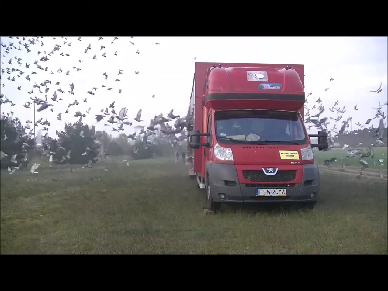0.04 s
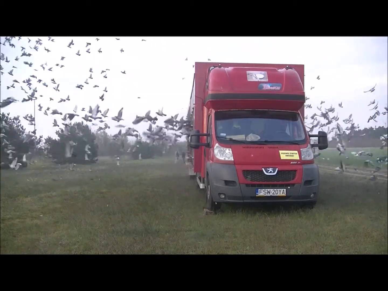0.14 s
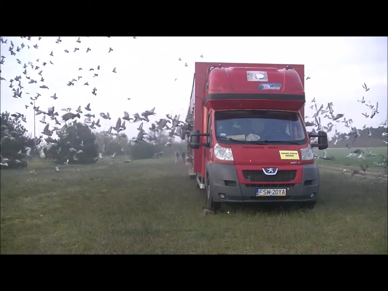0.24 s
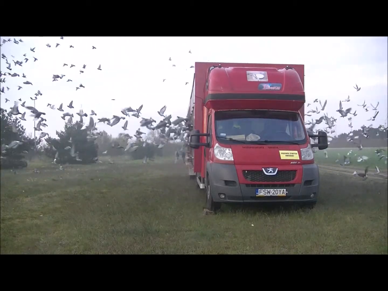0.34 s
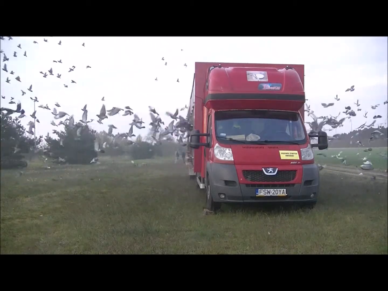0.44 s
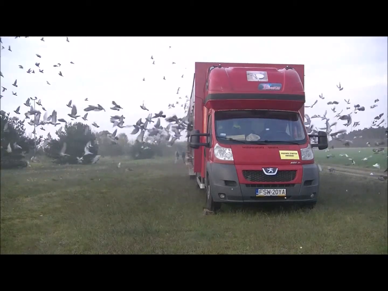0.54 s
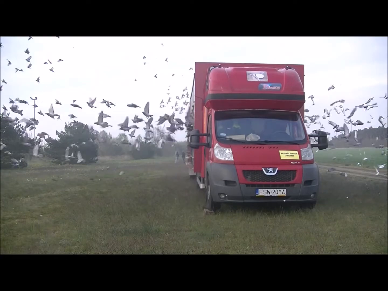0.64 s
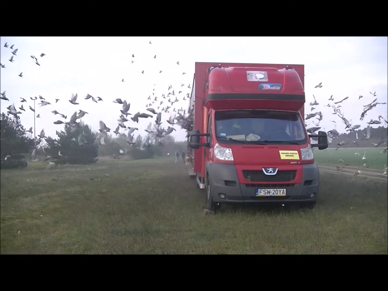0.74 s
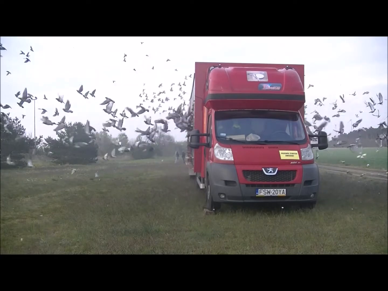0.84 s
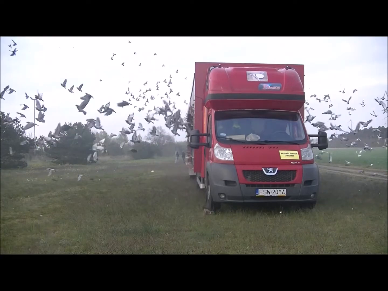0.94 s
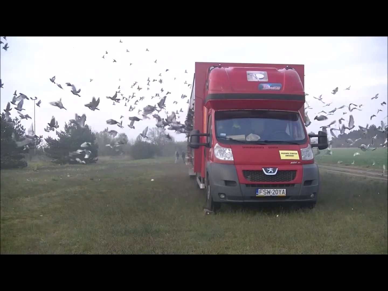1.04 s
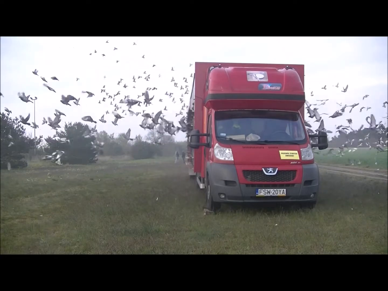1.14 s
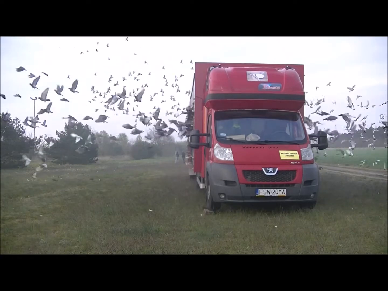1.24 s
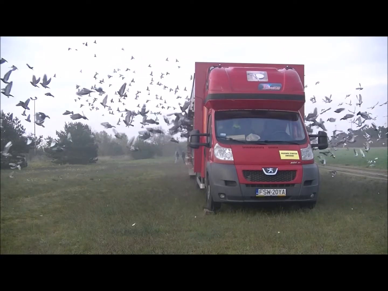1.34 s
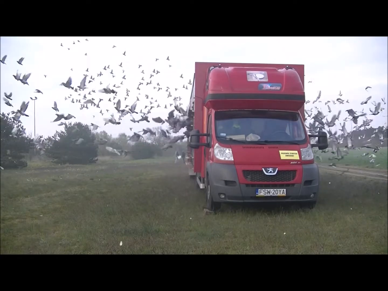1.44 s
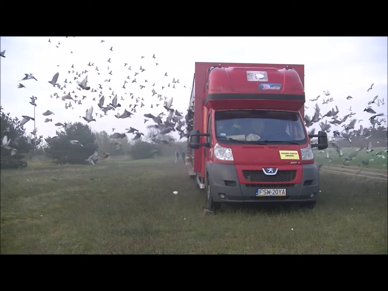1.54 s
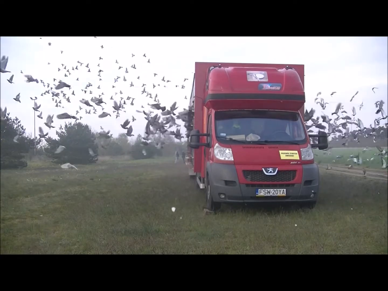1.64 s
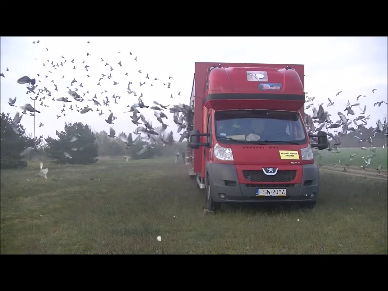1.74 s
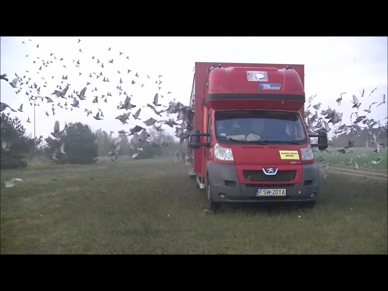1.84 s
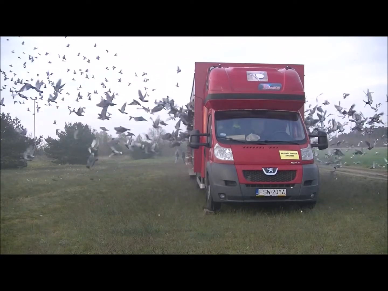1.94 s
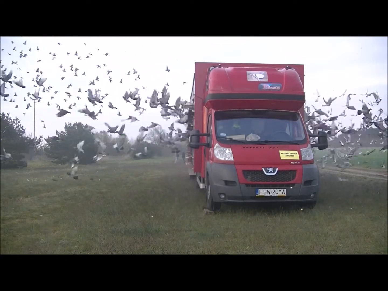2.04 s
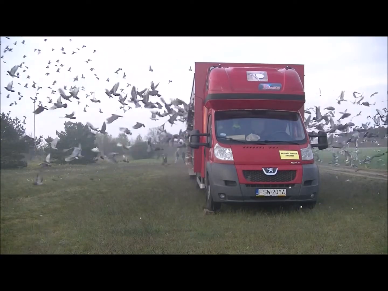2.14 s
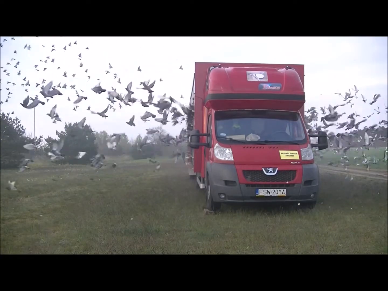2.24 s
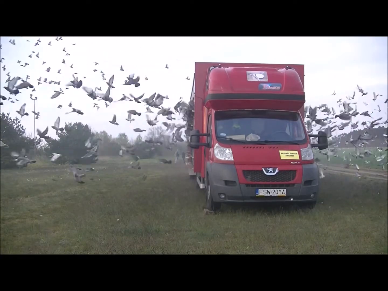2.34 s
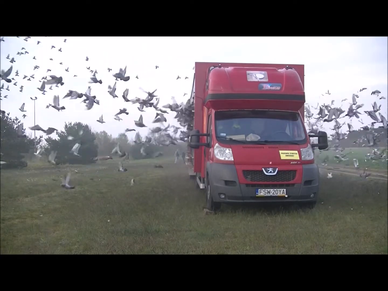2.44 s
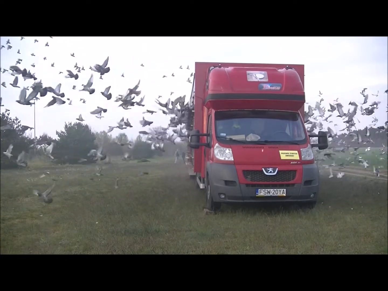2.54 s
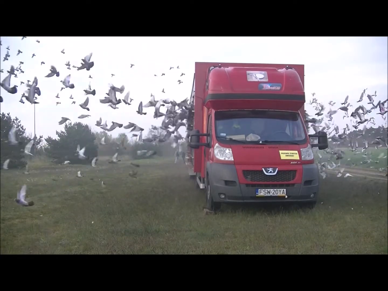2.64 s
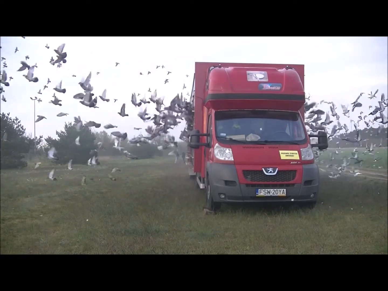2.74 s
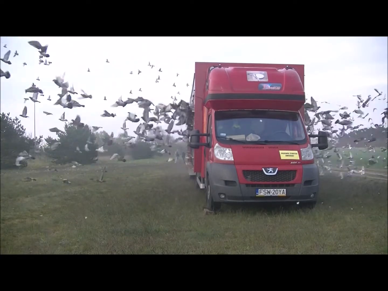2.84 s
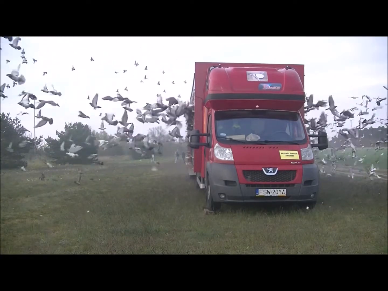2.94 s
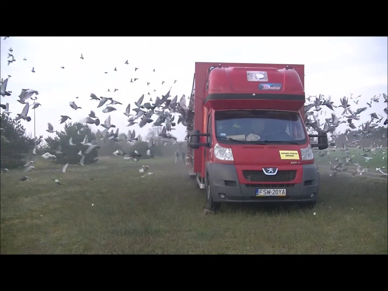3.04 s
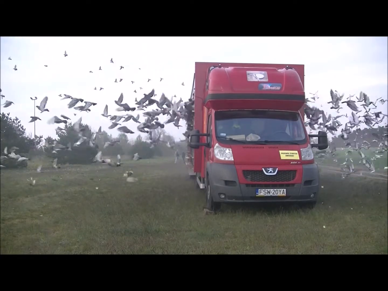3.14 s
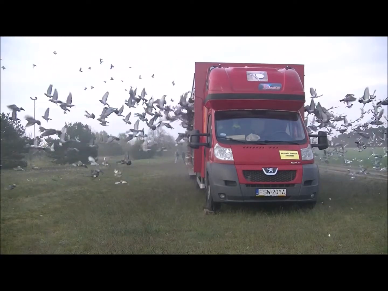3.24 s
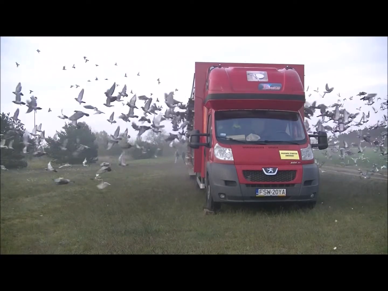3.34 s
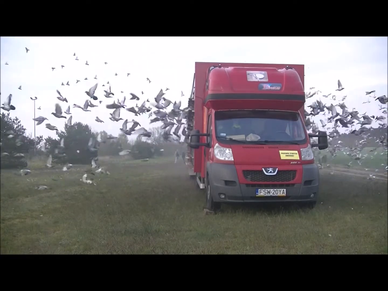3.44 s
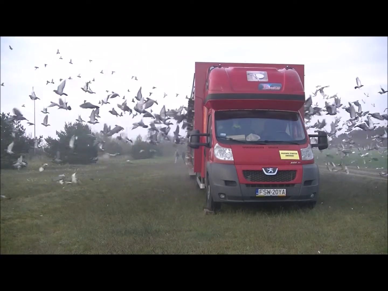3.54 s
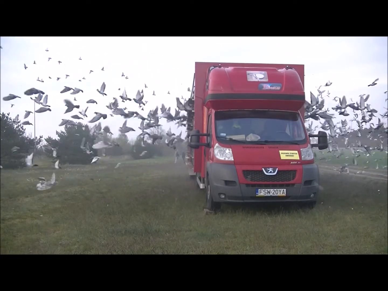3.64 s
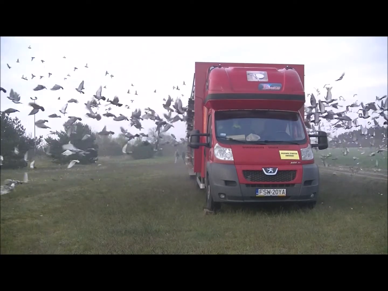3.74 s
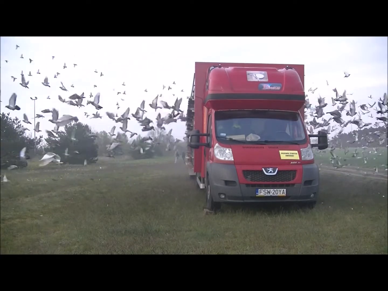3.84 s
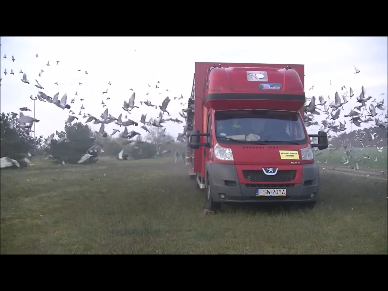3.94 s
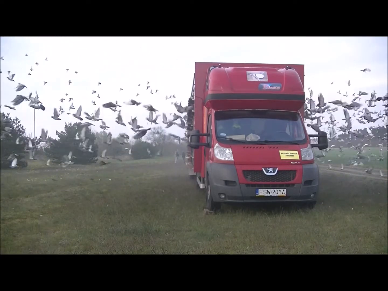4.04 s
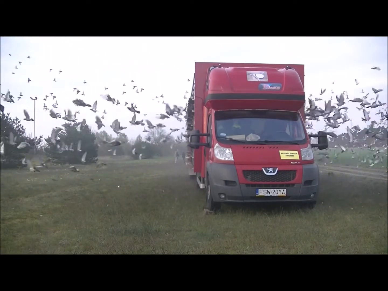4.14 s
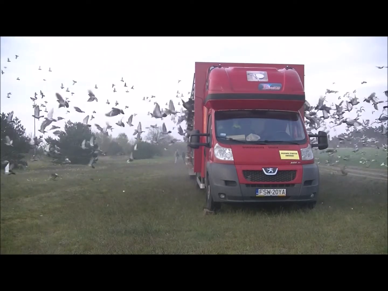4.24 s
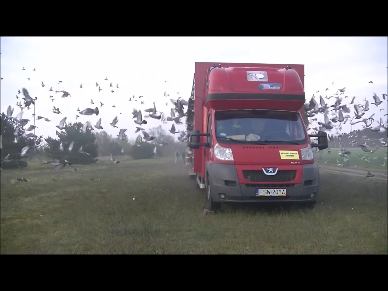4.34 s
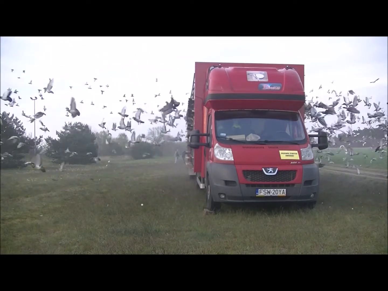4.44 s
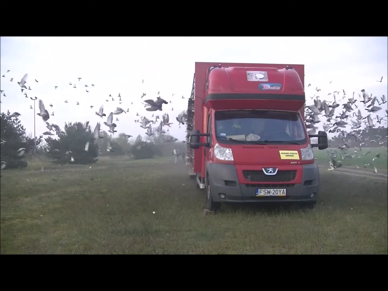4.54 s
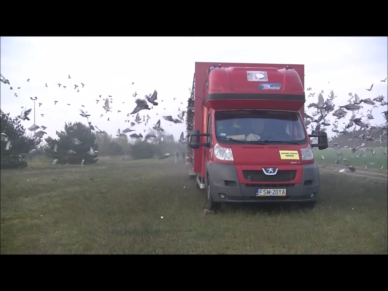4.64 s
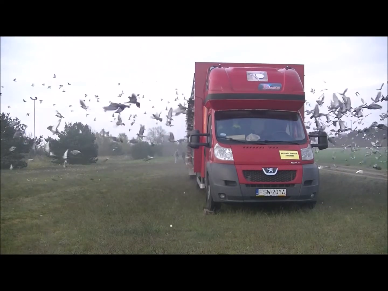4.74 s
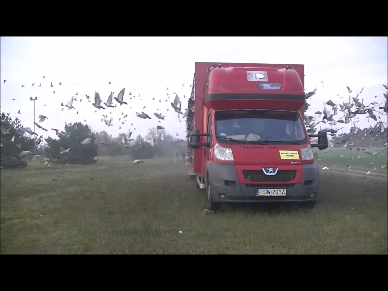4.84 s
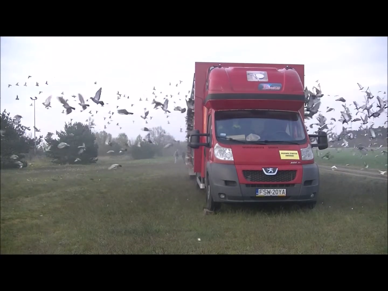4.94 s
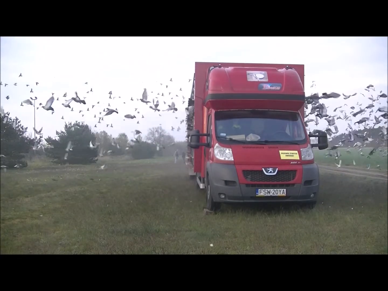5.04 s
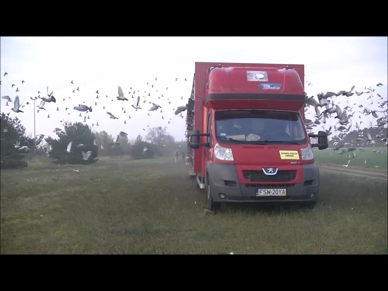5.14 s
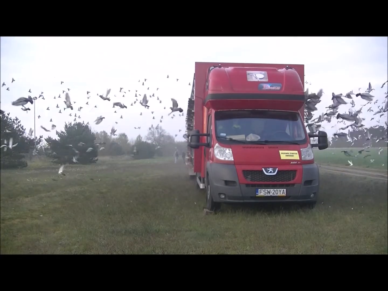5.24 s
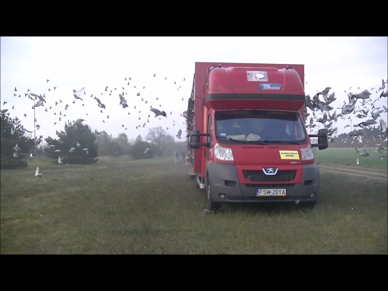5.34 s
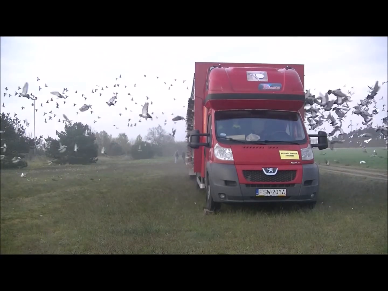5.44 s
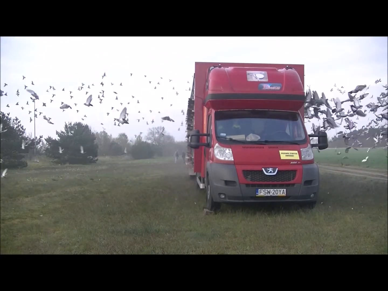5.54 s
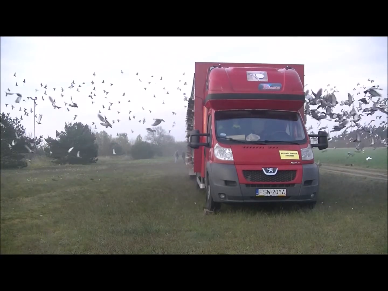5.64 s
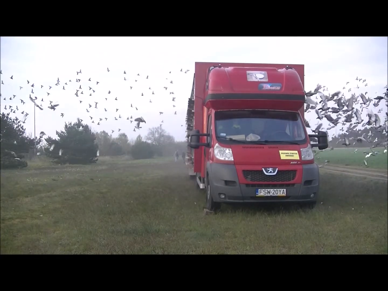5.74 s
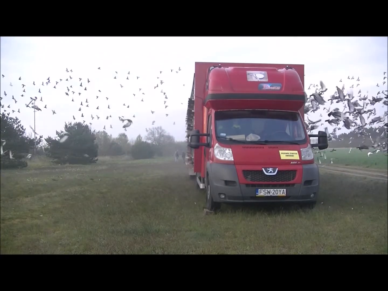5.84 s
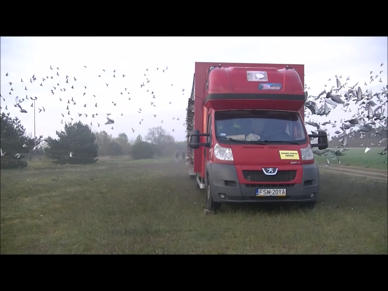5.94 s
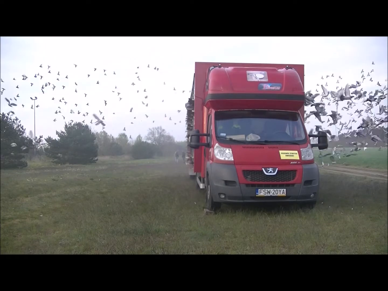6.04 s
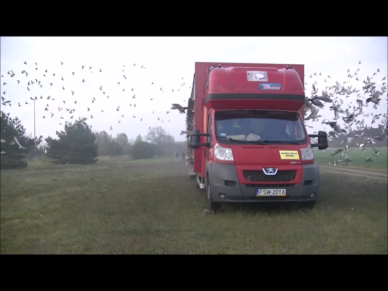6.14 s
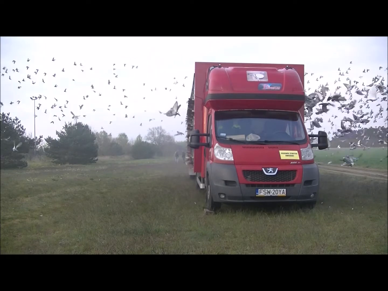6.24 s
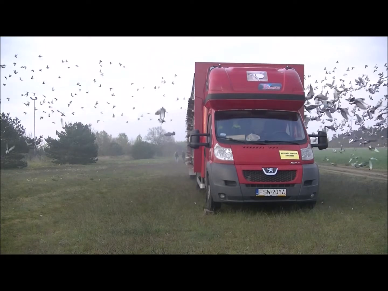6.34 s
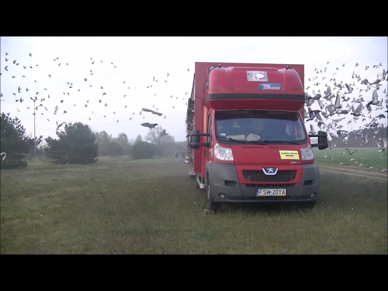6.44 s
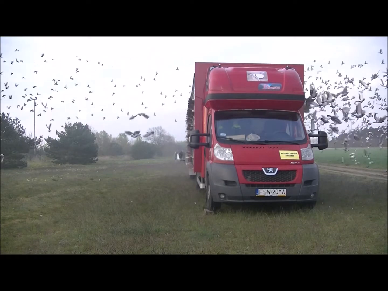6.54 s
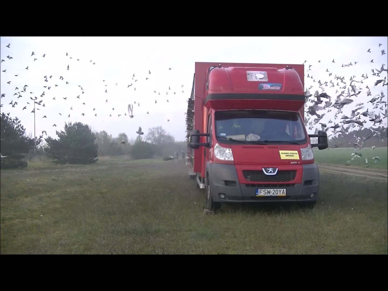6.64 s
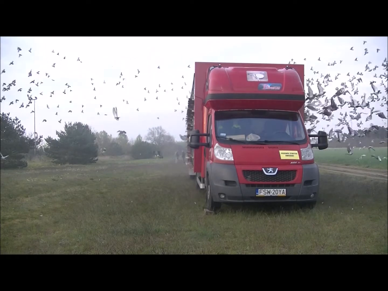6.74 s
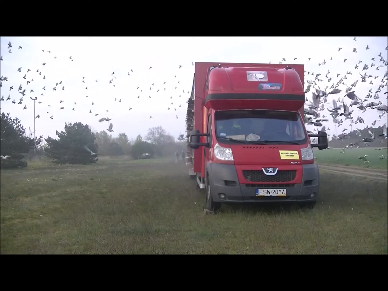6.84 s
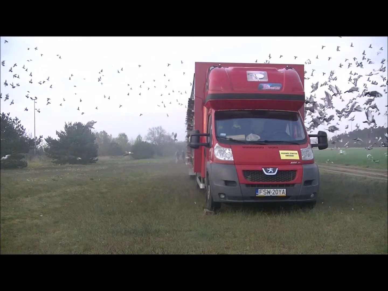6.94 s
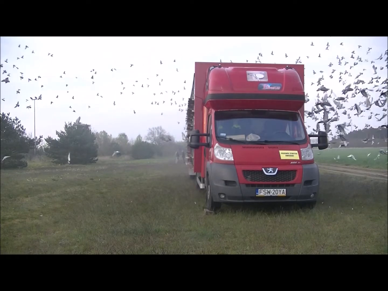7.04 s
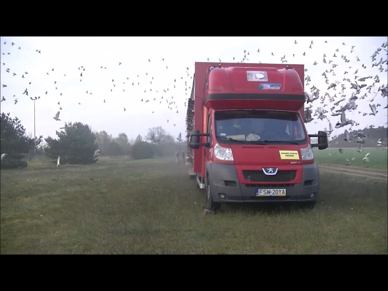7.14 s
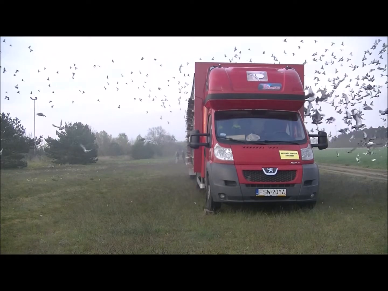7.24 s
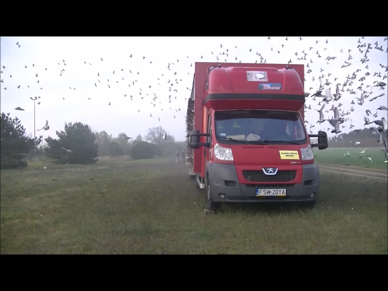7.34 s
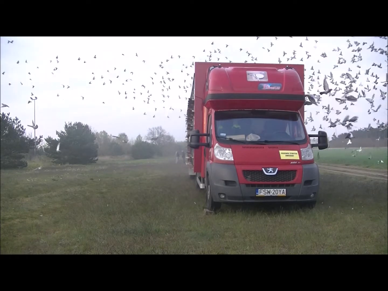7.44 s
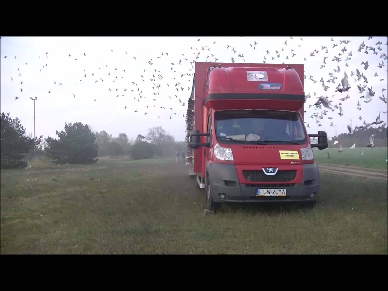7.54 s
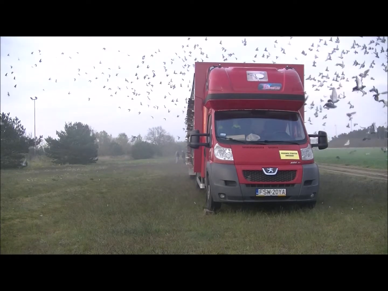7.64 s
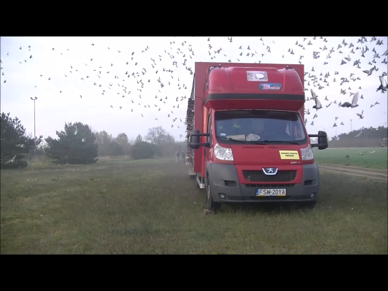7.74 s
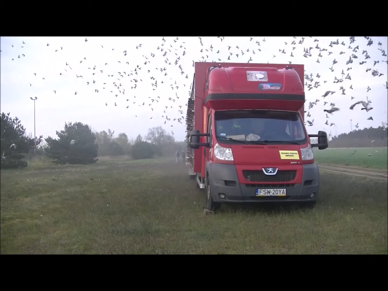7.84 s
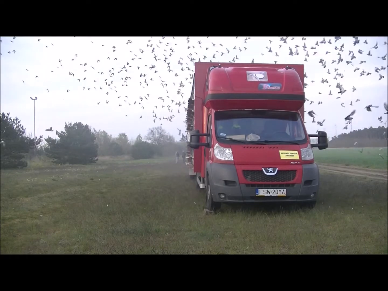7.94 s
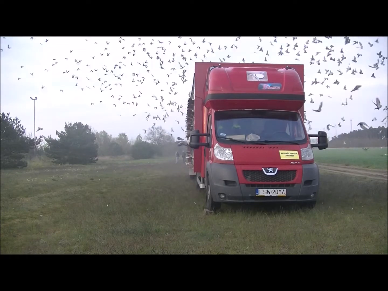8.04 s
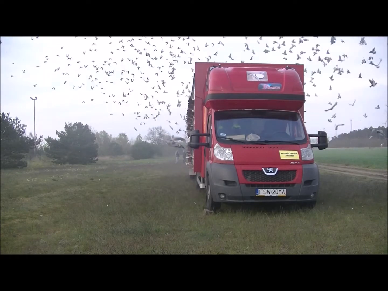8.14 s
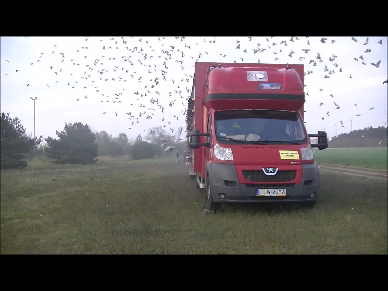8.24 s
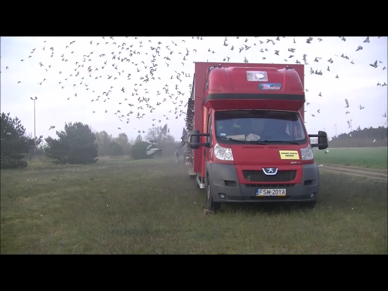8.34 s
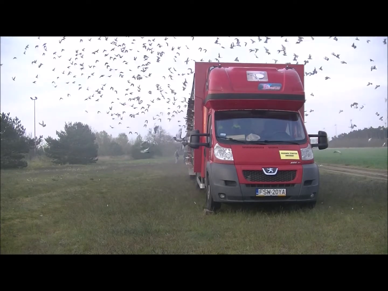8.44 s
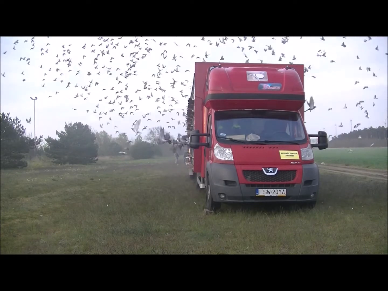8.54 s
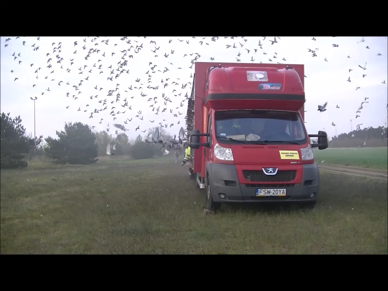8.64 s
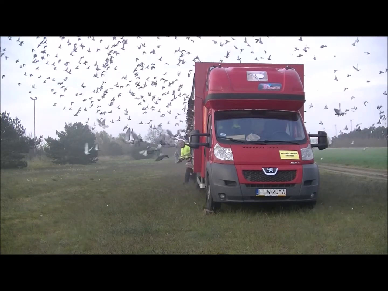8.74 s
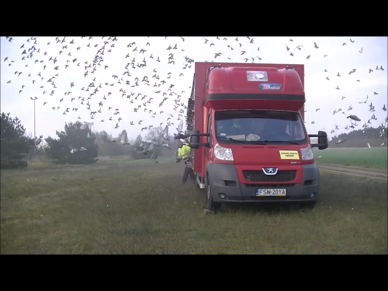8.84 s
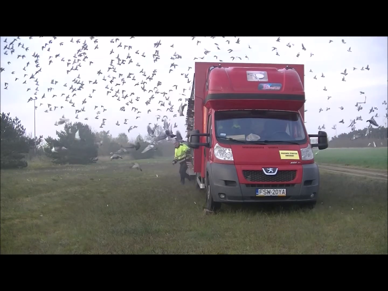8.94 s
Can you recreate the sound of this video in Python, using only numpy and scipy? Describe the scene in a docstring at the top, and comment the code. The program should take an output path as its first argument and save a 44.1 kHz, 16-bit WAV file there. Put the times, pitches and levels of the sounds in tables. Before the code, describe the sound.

Hundreds of pigeon wings flutter and slap loudly outdoors, crackling with bright claps, thinning after several seconds while the camera is occasionally bumped.

```python
"""Pigeon flock taking off

A large flock of pigeons bursts out of crates on a van in an open field, some metres from a camera on a stand.
Wing strokes and slaps are overlapping bursts of noise; near wing claps are short pops with a snap and a flutter.
Now and then something knocks the camera: its stand and shell ring as fading sine waves under a noisy rattle.
Stirred air on its two microphone ports is low noise, with three puffs and one rising whoosh.
"""
import sys
import numpy as np
from scipy import signal
from scipy.fft import rfft, irfft, next_fast_len
from scipy.io import wavfile
from scipy.ndimage import uniform_filter1d

SR = 44100
rng = np.random.default_rng(int(sys.argv[2]) if len(sys.argv) > 2 else 0)


def persist_wave(psi):
    """Save psi, clipped to +-1, as 16-bit WAV."""
    counts = np.round(np.clip(psi, -1, 1) * 32767).astype(np.int16)
    wavfile.write(sys.argv[1], SR, np.atleast_2d(counts).T)


N = 396018  # samples, about 9 s


def undb(db):
    """Turn decibels into a plain gain."""
    return 10 ** (np.asarray(db) / 20)


def unit(x):
    """Scale a signal to an average (RMS) level of 1."""
    return x / np.sqrt(np.mean(x ** 2))


def curve(table):
    """Draw straight lines between the rows of a time table: each column at every sample."""
    s, *columns = np.transpose(table)
    return [np.interp(np.arange(N) / SR, s, column) for column in columns]


def along(table, hz):
    """Read a frequency table at any pitch, with straight lines on a logarithmic pitch scale."""
    table_hz, value = np.transpose(table)
    return np.interp(np.log(hz + 1), np.log(table_hz + 1), value)


def colour(table, size=2048):
    """Make a filter of energy 1 with the table's tone colour and no sound before its cause."""
    log_gain = np.log(undb(along(table, np.arange(size // 2 + 1) * SR / size)))
    # folding the cepstrum moves all of the response after time zero
    cepstrum = irfft(log_gain)
    cepstrum[1:size // 2] *= 2
    cepstrum[size // 2 + 1:] = 0
    response = irfft(np.exp(rfft(cepstrum)))
    return response / np.sqrt(np.sum(response ** 2))


def band(x, lo_hz, hi_hz):
    """Keep only the pitches between two limits."""
    return signal.sosfilt(signal.butter(2, [lo_hz, hi_hz], "bandpass", fs=SR, output="sos"), x)


def bands(low, middle, high, body_hz=2400, snap_hz=6800):
    """Join body, middle and snap of a wing sound, crossfaded so that equal parts add up flat."""
    hz = np.arange(N // 2 + 1) * SR / N
    body = 1 / (1 + (hz / body_hz) ** 3)
    snap = 1 - 1 / (1 + (hz / snap_hz) ** 8)
    return irfft(body * rfft(low) + (1 - body - snap) * rfft(middle) + snap * rfft(high), N)


def scatter(rate, spread_db, colour_db):
    """Random onsets, a few loud among many weak; each has its own body, middle and snap."""
    chance = rng.random((int(rate * N / SR), 2))
    loudness_db = -spread_db * np.log(1 - .98 * chance[:, 1])
    size = undb(loudness_db + colour_db * rng.standard_normal((len(chance), 3)).T)
    place = (chance[:, 0] * N).astype(int)
    return np.array([np.bincount(place, part, N) for part in size])


def puff(onsets, rise_s, fall_s):
    """A burst of air from each onset: its loudness rises, then dies away."""
    t = np.arange(int(8 * fall_s * SR) + 8) / SR
    shape = (1 - np.exp(-t / rise_s)) * np.exp(-t / fall_s)
    return np.abs(signal.oaconvolve(onsets, shape[None])[:, :N])


def smooth(x, length_s):
    """Average twice over a short window, so that noise becomes a slow wander."""
    length = int(length_s * SR)
    return uniform_filter1d(uniform_filter1d(x, length), length)


SURGE_DB, SURGE_S = 0.62, 0.023  # groups of birds leave together: depth and length of the surges

# The crowd of wings over time:
# (time [s], rush level [dB], deep part against the rush [dB], snap against the rush [dB],
#  how far single wing tips stand out [dB])
FLOCK_OVER_TIME = [(0.0, -26.5, 0, -1.5, 2.5), (0.92, -28, 2, 0.5, 0.5), (2.4, -26, 1, 0.5, -1),
                   (3.55, -24.5, 0, 0, 1), (5.1, -30, 1.5, -1, 0.5), (6.65, -30.5, 0, -1.5, 4.5),
                   (7.18, -30.5, -0.5, -2, 2.5), (8.2, -40, 4.5, 0, 3.5), (8.5, -36.5, 4.5, -1, 1),
                   (8.98, -32.5, -0.5, 1, 4)]


def flock():
    """Far wing tips clap in thin cracks; strokes, slaps and a distant blur shape the rush of air."""
    rush_db, deep_db, snap_db, tips_db = curve(FLOCK_OVER_TIME)
    strokes = unit(puff(scatter(110, 0.96, 3.0), 0.0029, 0.0033))
    tip_onsets = scatter(170, 2.73, 4.45) * undb([[-6], [0], [0]])  # wing tips clap thin
    slaps = unit(puff(tip_onsets, 0.00019, 0.0013))
    # distance dulls the blur, so single wings stand out more in the treble
    blur_db = np.array([[-1.5], [-5.5], [-5.5]])
    stroke_power = undb(-7.5) ** 2 * strokes ** 2
    slap_power = undb(tips_db - 9.5) ** 2 * slaps ** 2
    power = stroke_power + slap_power + undb(blur_db) ** 2
    surge = unit(smooth(rng.standard_normal(N), SURGE_S))
    gain = undb(rush_db + SURGE_DB * surge + np.array([deep_db, 0 * deep_db, snap_db]))
    far_crack = gain * undb(tips_db - 8.5) * unit(tip_onsets)
    rush = gain * np.sqrt(power / power.mean(axis=1, keepdims=True))
    return far_crack, rush


# other near claps fall by chance: level over the rush and its range; snap; pitch and its spread
STRAY_CLAPS, STRAY_OVER_DB, STRAY_RANGE_DB = 200, 14, 2.5
STRAY_SNAP_DB, STRAY_HZ, STRAY_OCT = -27.5, 4240, 0.41
CLAP_CYCLES, CLAP_LATE_S = 1.13, 0.001205  # basic width of a pop; from the listed time to its middle
SNAP_DB, FLUTTER_DB = 23, -7  # added to every snap; added to every flutter

# The loudest near wing claps:
# (time [s], level [dB], pitch [Hz], snap against the level, before the common boost [dB])
NEAR_CLAPS = [(0.1685, -9, 4870, -30), (0.2897, -9, 5120, -21), (0.431, -8, 5270, -20),
              (0.5026, -9.5, 1490, -14), (0.8345, -7.5, 4470, -25), (1.161, -4, 5020, -22),
              (1.281, -9.5, 4240, -17), (1.3274, -8, 4440, -26), (1.484, -4, 4970, -26),
              (1.882, -3.5, 4860, -22), (2.2003, -3, 4140, -29), (2.3303, -7.5, 5030, -28),
              (2.4039, -16.5, 1040, -24), (2.6549, -7.5, 5300, -32), (2.8125, -2, 4820, -28),
              (3.037, -11, 4560, -27), (3.2515, -7, 4540, -23), (3.2715, -10, 5100, -21),
              (3.3833, -8, 4410, -27), (3.7758, -4.5, 4340, -26), (4.0028, -15, 4970, -22),
              (4.4218, -9.5, 4690, -18), (5.0554, -13.5, 4800, -27), (5.0789, -14, 5220, -26),
              (5.0965, -8, 4830, -28), (5.2225, -8, 4740, -28), (5.3423, -5, 5370, -24),
              (5.5894, -11, 4410, -31), (6.5532, -8.5, 3880, -21), (6.694, -8.5, 5060, -31),
              (6.829, -8, 4580, -21), (6.8683, -7.5, 4770, -24), (6.9541, -10, 4700, -24),
              (6.983, -6.5, 4560, -26), (7.3404, -9, 4600, -23), (7.374, -10, 5130, -30),
              (7.452, -9.5, 5050, -21), (7.508, -9.5, 5100, -27), (7.6163, -7.5, 4880, -27),
              (7.8922, -12, 5070, -25), (8.0272, -10.5, 5100, -25), (8.1827, -9.5, 3850, -26),
              (8.3409, -14, 2980, -34), (8.415, -13.5, 4470, -21), (8.4506, -8, 4170, -25),
              (8.6697, -3.5, 4350, -22), (8.7753, -7, 4480, -20), (8.845, -8.5, 4950, -25)]


def claps():
    """Wing tips meet: a pop of a few cycles at its own pitch, a thin snap, then a short flutter."""
    pick = rng.standard_normal((STRAY_CLAPS, 3)).T
    when = rng.random(STRAY_CLAPS) * (N / SR - .01)
    rush_db = curve(FLOCK_OVER_TIME)[0][(when * SR).astype(int)]
    stray_db = rush_db + STRAY_OVER_DB + STRAY_RANGE_DB * pick[0] / 2
    stray = [when, stray_db, STRAY_HZ * 2 ** (STRAY_OCT * pick[1]), STRAY_SNAP_DB + 4 * pick[2]]
    s, level_db, hz, snap_db = np.hstack([np.transpose(NEAR_CLAPS), stray])

    chance = rng.standard_normal((len(s), 2)).T
    centre = ((s + CLAP_LATE_S) * SR).astype(int)
    reach = np.arange(-100, 200)  # samples around the middle of a pop
    turns = reach * hz[:, None] / SR
    # a pop swells faster than it fades
    width = CLAP_CYCLES * undb(2 * chance[:1].T) * np.where(turns < 0, .6, 1.3)
    swell = undb(level_db)[:, None] * np.exp(-(turns / width) ** 2)
    pop = np.zeros(N + 200)
    np.add.at(pop, centre[:, None] + reach, swell * np.cos(2 * np.pi * turns + chance[1:].T))

    onsets = np.zeros((3, N))  # body, middle, snap
    body_db = -8 - 6 * np.log2(hz / 3000)  # higher claps have less body
    onsets[:, centre] = undb(level_db + np.array([body_db, 0 * s, snap_db + SNAP_DB]))
    crack = onsets * [[1.5], [0], [2.2]]
    flutter = undb(FLUTTER_DB) * puff(onsets, 0.0003, 0.0023)
    return pop[:N], crack, flutter


SWAY_HZ, STAND_HZ, THUD_HZ, SHELL_HZ, CRACK_HZ = 78, 180, 310, 1300, 8000
SWAY_DB = -6.5  # the stand sways with the thud
CRACK_DB, CRACK_S = 4.5, 0.0013  # a hard blow cracks: over the shell's ring at CRACK_HZ; fall time
CLACK_OCT, REBOUND_S = 0.23, .0035  # width of the clack about SHELL_HZ; delay of the rebound
RATTLE_TOP_HZ, RATTLE_OCT_PER_DB = 3500, .2  # a softer blow rattles duller
CHATTER_DB, CHATTER_S = 2.5, .003  # loose parts make the shell's rings waver

# Ringing tones of stand and shell: (pitch [Hz], relative level [dB], time to fall by 60 dB [s])
STAND_AND_SHELL = [(43.6, -17, 0.83), (78.2, -8.5, 0.66), (178, 9, 0.38), (200, 5.5, 0.1),
                   (269, 6.5, 0.068), (340, 5, 0.037), (476, 2.5, 0.039), (613, 0, 0.05),
                   (860, -7.5, 0.032), (1200, -12.5, 0.17), (1323, 5.5, 0.078), (2208, 4, 0.052),
                   (2950, 3, 0.03), (4220, 1, 0.051), (6610, 0.5, 0.086), (7350, 11.5, 0.014),
                   (7760, 10, 0.0091)]
# Knocks on the camera, levels relative:
# (time [s], rattle [dB], thud [dB], ring of the stand [dB], ring of the shell [dB],
#  hardness [dB per octave], extra clack [dB], rebound against the blow [dB])
CAMERA_KNOCKS = [(2.378, -22, -34, -55, -29.5, -2.5, 2, -7), (3.005, -12.5, -33, -44.5, -25, 1, 8, -6),
                 (4.87, -19.5, -38, -33, -27, 2, 6.5, 0), (5.176, -31, -42, -43, -32, -4, 3.5, -5),
                 (6.106, -39, -52, -47, -41, -6, 4, -7), (7.671, -22, -49, -38.5, -31.5, -4.5, -1, -4),
                 (7.763, -20, -42, -38.5, -29.5, 3.5, 4.5, -7), (8.498, -15, -37, -41, -24, 1, -6, -10.5)]


def knocks():
    """Each blow, with a rebound, rings the same tones; a harder blow rings the shell brighter and cracks."""
    out, t = np.zeros((2, N + SR)), np.arange(SR) / SR
    hz, tone_db, t60 = (column[:, None] for column in np.transpose(STAND_AND_SHELL))
    # the shell shakes the ports further out of step in the treble
    lag = np.minimum(0.39 + hz / 6000, 1.6)  # radians
    for s, rattle_db, thud_db, stand_db, shell_db, hard_db, clack_db, rebound_db in CAMERA_KNOCKS:
        chance = rng.standard_normal((len(STAND_AND_SHELL), 2))

        def bright_db(f):
            """Shell level at a pitch: hardness tilts it about SHELL_HZ."""
            return shell_db + hard_db * np.log2(f / SHELL_HZ)

        low_db = np.interp(np.log(hz), np.log([SWAY_HZ, STAND_HZ, THUD_HZ]),
                           [SWAY_DB + thud_db, stand_db, thud_db])
        clack = clack_db * np.exp(-(np.log2(hz / SHELL_HZ) / CLACK_OCT) ** 2)
        blow_db = np.where(hz < 1.3 * THUD_HZ, low_db, bright_db(hz) + clack)
        gain = undb(tone_db + blow_db + 1.1 * chance[:, :1])
        # each tone takes a cycle or two to get going
        envelope = gain * np.exp(-np.log(1000) * t / t60) * (1 - np.exp(-t * hz / 1.12))
        steps = rng.standard_normal((len(STAND_AND_SHELL), int(1 / CHATTER_S) + 2))
        waver = np.array([np.interp(t / CHATTER_S, np.arange(len(row)), row) for row in steps])
        envelope *= undb(CHATTER_DB * (hz > THUD_HZ) * waver)
        phase = 2 * np.pi * hz * (1 + .0005 * chance[:, 1:]) * t

        rattle_top_hz = RATTLE_TOP_HZ * 2 ** (RATTLE_OCT_PER_DB * hard_db)
        rattle_noise = band(rng.standard_normal(SR), 150, rattle_top_hz)
        rattle = undb(rattle_db) * np.exp(-t / 0.0078) * rattle_noise
        crack_noise = band(rng.standard_normal(SR), 5200, 14000)
        rattle += undb(bright_db(CRACK_HZ) + CRACK_DB) * np.exp(-t / CRACK_S) * crack_noise

        left = (envelope * np.sin(phase)).sum(0) + rattle
        right = undb(-1.0) * ((envelope * np.sin(phase - lag)).sum(0) + rattle)
        blow = undb(3.5) * np.array([left, right])
        rebound = np.pad(blow, ((0, 0), (int(REBOUND_S * SR), 0)))[:, :SR]
        start = int((s + 0.001106) * SR)
        out[:, start:start + SR] += blow + undb(rebound_db) * rebound
    return out[:, :N]


# one whoosh: start, level, pitch at the start, climb; length, fade at both ends
WHOOSH_S, WHOOSH_DB, WHOOSH_HZ, WHOOSH_OCT_PER_S = 8.075, -40.5, 177, 13
WHOOSH_HOLD_S, WHOOSH_EDGE_DB_PER_S = .1, 613
PUFF_RISE_S, PUFF_FALL_S = 0.0035, 0.0065

# Air on the ports: (time [s], buffeting level [dB], deepest rumble level [dB])
AIR_OVER_TIME = [(0, -76, -80), (2.5, -65, -76), (4.5, -64, -72), (6.3, -66, -73), (6.95, -56, -70),
                 (7.5, -63, -65), (8.1, -49.5, -56), (8.35, -56, -53), (8.6, -63, -64), (8.98, -63, -70)]
# Single puffs of air on the ports: (time [s], relative level [dB])
AIR_PUFFS = [(6.908, -28), (6.937, -35), (7.16, -31)]


def air():
    """Low noise buffets the ports unequally over a common rumble, with a few puffs and one rising whoosh."""
    mid, side = (unit(band(rng.standard_normal(N), 65, 176)) for _ in range(2))
    deep = unit(band(rng.standard_normal(N), 35, 63))
    buffet_db, deep_db = curve(AIR_OVER_TIME)
    buffeting = undb(buffet_db) * (mid + 0.85 * side * np.array([[1], [-1]]))
    rumble = undb(deep_db) * deep

    # the whoosh is a narrow band of noise: a climbing tone that wanders in strength and phase
    t = np.arange(N) / SR - WHOOSH_S
    hz = WHOOSH_HZ * 2 ** (WHOOSH_OCT_PER_S * np.clip(t, -WHOOSH_HOLD_S, WHOOSH_HOLD_S))
    outside_s = np.maximum(0, np.maximum(-t, t - WHOOSH_HOLD_S))
    whoosh_db = WHOOSH_DB - WHOOSH_EDGE_DB_PER_S * outside_s
    slow = unit(smooth(rng.standard_normal((2, N)), 0.0032))
    phase = 2 * np.pi * np.cumsum(hz) / SR
    whoosh = undb(whoosh_db) * (slow[0] * np.cos(phase) + slow[1] * np.sin(phase))

    onsets = np.zeros((1, N))
    onsets[0, [int(s * SR) for s, _ in AIR_PUFFS]] = undb([db for _, db in AIR_PUFFS])
    puffs = unit(band(rng.standard_normal(N), 80, 290)) * puff(onsets, PUFF_RISE_S, PUFF_FALL_S)
    return puffs + buffeting + rumble + whoosh


# Colour of the wings as the camera hears them: (pitch [Hz], relative level [dB])
WING_COLOUR = [(40, -32), (150, -16.5), (260, -12.5), (450, -12.5), (820, -3), (2000, -4.5), (3300, -5.5),
               (4900, 0), (5500, -3.5), (6300, -13.5), (7800, -13), (9000, -23.5), (11000, -20),
               (12700, -26.5), (16000, -25.5)]
# Colour of what differs between the ports: (pitch [Hz], relative level [dB])
PORT_DIFFERENCE = [(40, -40), (90, -25), (170, -10), (400, -7), (800, -4), (2200, -4), (5000, -1),
                   (6500, -5.5), (7900, -7), (10000, -18.5), (16000, -19.5)]
# How far the left port leads: (pitch [Hz], lead [radians])
LEFT_LEAD = [(300, .2), (800, .5), (3100, .3), (5900, .8), (7000, 0), (8300, -2), (9700, 0)]
# Balance of the ports: (pitch [Hz], left minus right [dB])
LEFT_TILT = [(60, -1), (200, -4.5), (500, -9), (1200, -3), (2400, -3), (5000, -2), (9000, 2)]


def scene():
    """Wings reach both ports with a small lead and tilt; knocks and air act on the camera itself."""
    pop, crack, flutter = claps()
    far_crack, rush = flock()
    envelope = np.sqrt(rush ** 2 + flutter ** 2)
    wings = bands(*(envelope * rng.standard_normal(N) + crack + far_crack))
    mid = signal.oaconvolve(wings, colour(WING_COLOUR))[:N] + pop
    apart = bands(*(envelope * rng.standard_normal(N)))
    side = signal.oaconvolve(apart, colour(PORT_DIFFERENCE))[:N]
    # the two ports hear the common sound with their own level and lag: half the difference each
    size = next_fast_len(N)
    hz = np.arange(size // 2 + 1) * SR / size
    half = undb(along(LEFT_TILT, hz) / 2) * np.exp(.5j * along(LEFT_LEAD, hz))
    ports = irfft(rfft(mid, size) * np.array([half, 1 / half]), size)[:, :N]
    return ports + undb(-10.5) * side * np.array([[1], [-1]]) + knocks() + air()


TOP_HZ = 15800


def record(dry):
    """The camera clips the loudest peaks and cuts the treble above TOP_HZ."""
    clipped = np.clip(dry, -.93, .93)
    return signal.sosfilt(signal.ellip(8, .2, 60, TOP_HZ, fs=SR, output="sos"), clipped)


dry = scene()
out = record(dry)
persist_wave(out)
```